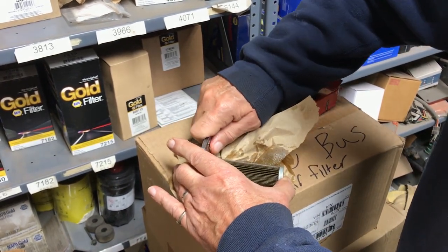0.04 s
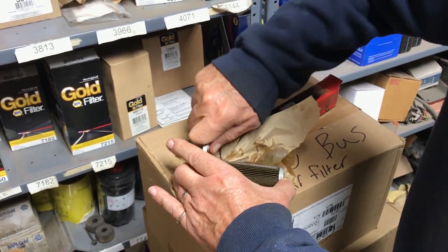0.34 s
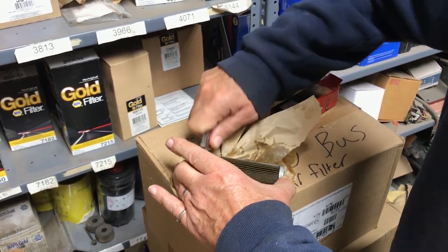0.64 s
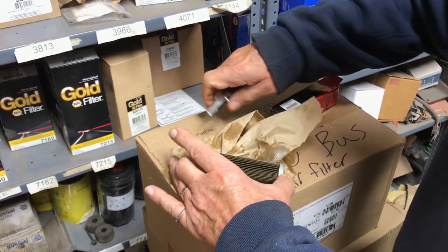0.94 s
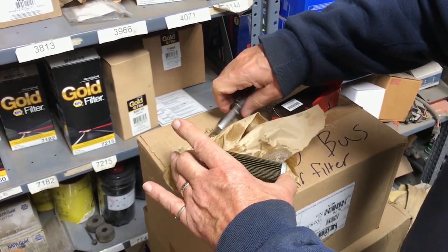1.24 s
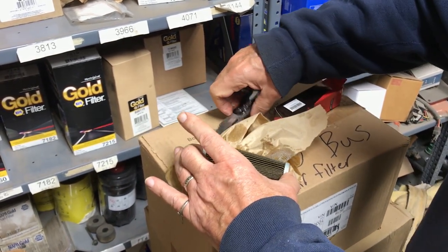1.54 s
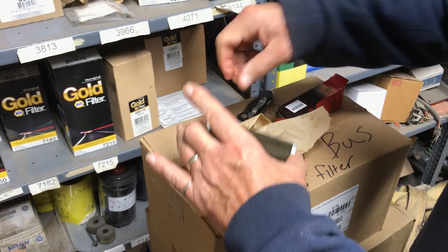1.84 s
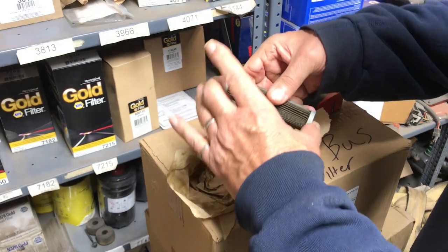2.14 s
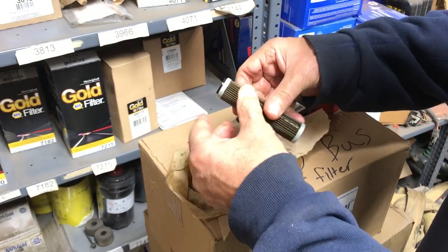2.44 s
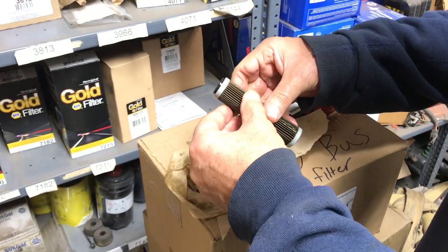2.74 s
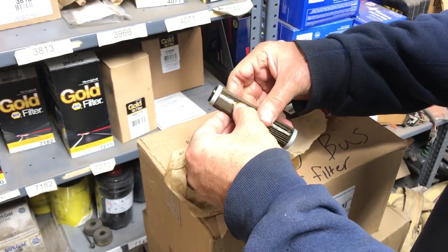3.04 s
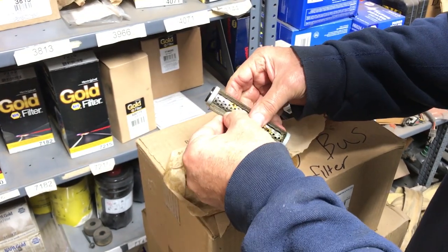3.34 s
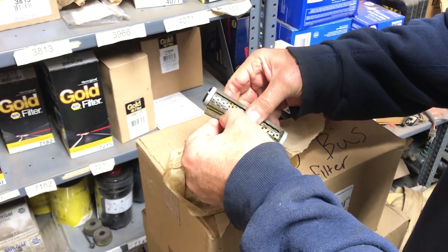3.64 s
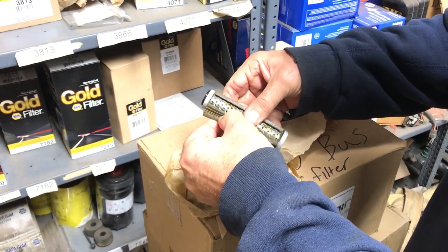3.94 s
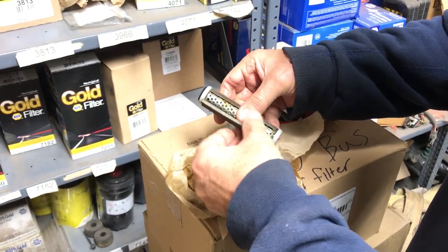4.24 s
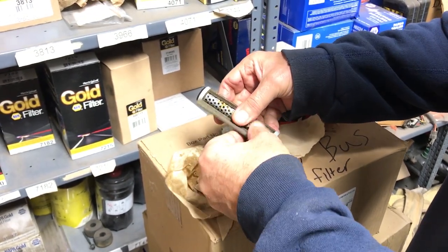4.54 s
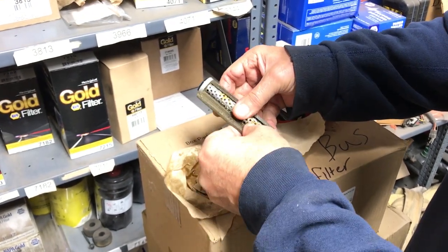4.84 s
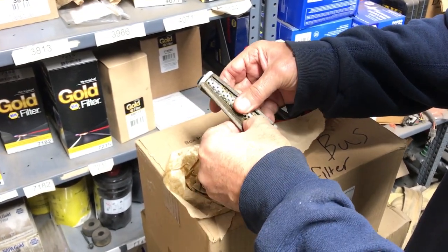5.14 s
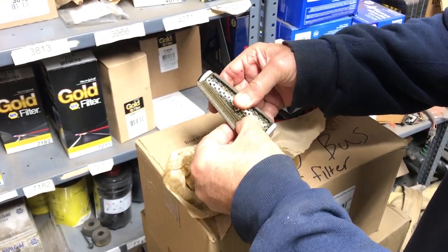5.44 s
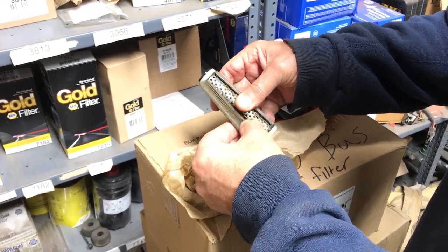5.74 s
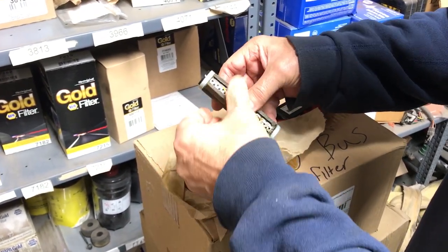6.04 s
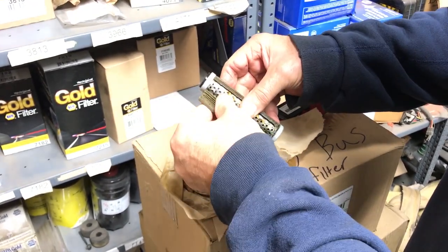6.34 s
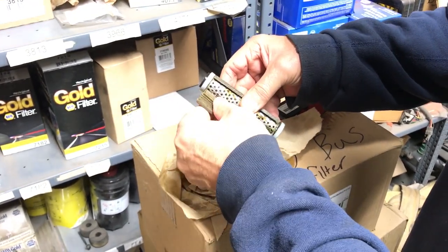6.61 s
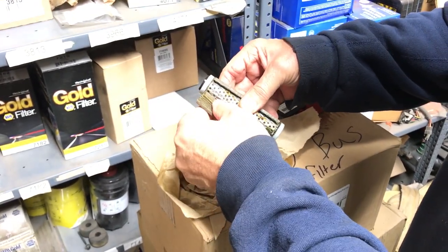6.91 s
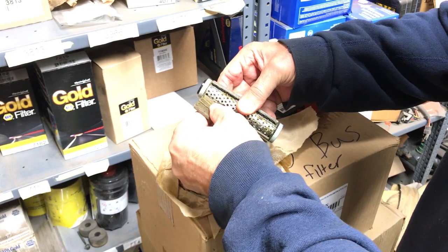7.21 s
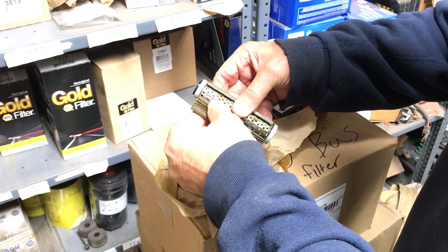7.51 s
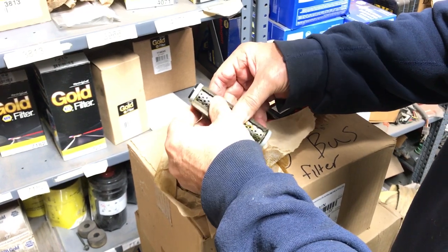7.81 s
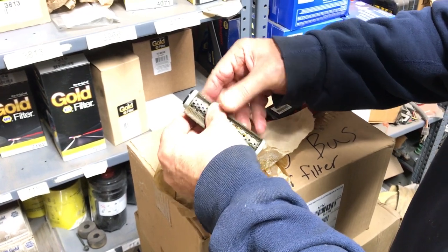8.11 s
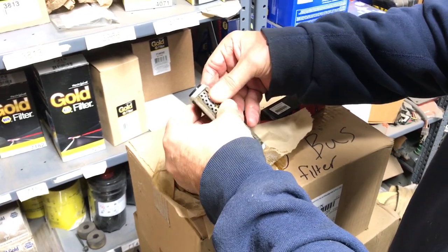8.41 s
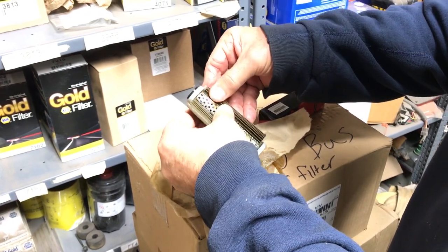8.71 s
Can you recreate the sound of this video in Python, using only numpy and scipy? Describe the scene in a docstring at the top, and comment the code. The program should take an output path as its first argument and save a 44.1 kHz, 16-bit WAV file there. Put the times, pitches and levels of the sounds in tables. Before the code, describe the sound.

A knife scrapes and knocks on a cardboard box, then fingers softly crinkle and tear pleated paper over a low indoor hum.

```python
"""A knife scrapes and taps a cardboard box as it slits a small pleated paper filter element on the lid.
The knife drops with one hollow knock, ringing the box's modes, and rocks to rest; two faint squeaks pass.
Sleeves rustle, and fingers rub, crinkle and tear the pleats off their core: fibres slip, pleats buckle.
Ventilation, mains hum and a faint electronic whine fill the storeroom throughout."""
import sys
import numpy as np
from scipy import signal
from scipy.fft import rfft, irfft, next_fast_len
from scipy.io import wavfile
from scipy.ndimage import uniform_filter1d

SR = 44100
rng = np.random.default_rng(int(sys.argv[2]) if len(sys.argv) > 2 else 0)


def transcribe(u):
    """Save the signal u as a 16-bit wav file named by the first command-line argument.

    u: samples, shape (n,) or (channels, n), limited to [-1, 1]; the rate is SR.
    q: integer samples, one column per channel.
    """
    v = np.clip(np.atleast_2d(u).T, -1, 1)
    q = np.round(v * 32767).astype(np.int16)
    wavfile.write(sys.argv[1], SR, q)


N = 386757
T = np.arange(N) / SR

# Blade strokes. Each row: middle in s, length in s, cardboard drag in dB, paper hiss in relative dB.
STROKES = [(.09, 0.30496, -64, -66.5), (0.398, .26, -64, -74), (.64, .24, -59.5, -64.5),
           (0.903, 0.31177, -66.5, -67.5), (1.19, .09, -52.5, -69), (1.295, .07, -60, -88),
           (1.395, .05, -61, -80), (1.485, .1, -63, -80), (1.577, 0.092, -57.5, -68.5)]
# Spectra of cardboard, paper body and crisp paper edge. Each row: frequency in Hz, gain in dB.
CARDBOARD_SPECTRUM = [(50, -6.5), (150, 7.5), (270, 9), (420, -4), (800, -0.5), (1200, -3.5), (2000, -14.5),
                      (3500, -23), (8000, -28.5), (16000, -34.5)]
BODY_SPECTRUM = [(200, -13.5), (600, -21), (950, -6), (1400, 4), (2400, 4.5), (3400, 4), (4600, -5),
                 (8000, -29)]
EDGE_SPECTRUM = [(2000, -29), (4000, -5), (6000, -2), (8000, -5), (10500, -4.5), (13000, -2.5),
                 (15500, -2.5), (16500, -24.5)]


def from_db(db):
    """Decibels to gain."""
    return 10 ** (np.asarray(db) / 20)


def unit_rms(x):
    """Scale to rms 1."""
    return x / np.sqrt(np.mean(x ** 2) + 1e-30)


def unit_hit(x, length_s):
    """Scale to the energy of an rms-1 sound lasting length_s."""
    return x * np.sqrt(length_s * SR / np.sum(x ** 2))


def at_hz(points, hz):
    """Interpolate a table over log frequency."""
    points_hz, values = np.transpose(points)
    return np.interp(np.log(np.maximum(hz, 1)), np.log(points_hz), values)


def add(track, start_s, sound):
    """Mix a sound in at start_s."""
    start = int(round(start_s * SR))
    first, last = max(start, 0), min(start + len(sound), N)
    track[first:last] += sound[first - start:last - start]


def decay(t, t60_s):
    """Exponential fall, 60 dB in t60_s."""
    return np.exp(-np.log(1000) * t / t60_s)


def swell(length_s, peak_share, power):
    """Arched envelope peaking at peak_share of its length; a lower power holds it longer."""
    phase = np.interp(np.linspace(0, 1, int(length_s * SR)), [0, peak_share, 1], [0, .5, 1])
    return np.abs(np.sin(np.pi * phase)) ** power


def wobble(size, every_s):
    """Random drift of rms 1 on a time scale of every_s."""
    return unit_rms(uniform_filter1d(rng.standard_normal(size), size=int(every_s * SR)))


def colour(x, spectrum):
    """Minimum-phase filter with the given spectrum."""
    size = 2 * next_fast_len(len(x))
    gain = from_db(at_hz(spectrum, np.arange(size // 2 + 1) * SR / size))
    cepstrum = irfft(np.log(gain))
    cepstrum[1:size // 2] *= 2
    cepstrum[size // 2 + 1:] = 0
    return irfft(rfft(x, size) * np.exp(rfft(cepstrum)), size)[:len(x)]


def resonance(x, hz, width_hz):
    """Two-pole resonator, peak gain 1."""
    r = np.exp(-np.pi * width_hz / SR)
    poles = [1, -2 * r * np.cos(2 * np.pi * hz / SR), r * r]
    return signal.lfilter(np.array([1, 0, -1]) * (1 - r * r) / 2, poles, x)


def burst(t, t60_s, scatter_db, scatter_t60_s):
    """Noise crack plus its scatter from hands, box and shelves."""
    envelope = decay(t, t60_s) + from_db(scatter_db) * decay(t, scatter_t60_s)
    return rng.standard_normal(len(t)) * envelope


def friction(size, slips_per_s, spread_db, hiss_share):
    """Fibres slip at random with very unequal strength, over a smooth hiss."""
    strength = from_db(spread_db * np.minimum(rng.exponential(1, size), 3))
    slips = (rng.random(size) < slips_per_s / SR) * strength * rng.choice([-1, 1], size)
    return unit_rms(unit_rms(slips) + hiss_share * rng.standard_normal(size))


def background(air_db=-68):
    """Steady noise of ventilation and far machinery, with mains hum and electronic whine."""
    # Air noise spectrum. Each row: frequency in Hz, gain in dB.
    air_spectrum = [(20, -43), (31, -21), (42, -3), (60, -8.5), (90, -12.5), (125, -11.5), (160, -16.5),
                    (300, -20.5), (460, -26.5), (900, -29), (3000, -31), (4800, -36), (6000, -36),
                    (15700, -38.5), (16200, -65.5)]
    # Hum and whine partials. Each row: frequency in Hz, rms level in dB.
    partials = [(120, -70), (1012, -89.5), (2024, -91), (3036, -89), (4048, -89), (6067, -89.5),
                (7079, -98), (8091, -99), (9103, -91.5), (11127, -104)]
    tones = sum(from_db(db) * np.sqrt(2) * np.sin(2 * np.pi * (hz * T + rng.random()))
                for hz, db in partials)
    return tones + from_db(air_db) * unit_rms(colour(rng.standard_normal(N), air_spectrum))


def cutting():
    """The blade sticks and slips, the box amplifies it, and the paper hisses as it parts."""
    out = np.zeros(N)
    for middle_s, length_s, drag_db, slit_db in STROKES:
        envelope = swell(length_s, peak_share=.5, power=.76)
        slips = friction(len(envelope), slips_per_s=1500, spread_db=5.5, hiss_share=.32)
        drag = envelope * unit_rms(colour(slips, CARDBOARD_SPECTRUM))
        slit = rasp(length_s, crisp_db=-.5, pleat_hz=2764, edge_hz=5000, ring_share=.29)
        add(out, middle_s - length_s / 2, from_db(drag_db) * drag + from_db(slit_db - 1) * slit)
    return out


def paper(force, spectrum, hz, width_hz, ring_share):
    """The paper's broad colour plus the resonance of the moving pleat."""
    broad = colour(force, spectrum)
    return broad + ring_share * resonance(broad, hz, width_hz)


def rasp(length_s, crisp_db, pleat_hz, edge_hz, ring_share, jerk_db=2.5):
    """One jerky stroke on paper: tiny slips excite its body and its crisp edge."""
    envelope = swell(length_s, peak_share=.5063, power=.83)
    slips = friction(len(envelope), slips_per_s=1000, spread_db=3.4, hiss_share=.75)
    slips *= from_db(jerk_db * wobble(len(envelope), every_s=.008))
    body = paper(slips, BODY_SPECTRUM, pleat_hz, width_hz=170, ring_share=ring_share)
    body += .3 * ring_share * resonance(body, pleat_hz, width_hz=240)  # neighbouring pleats
    body += .349 * ring_share * resonance(body, 1.92 * pleat_hz, width_hz=400)  # second mode
    edge = paper(slips, EDGE_SPECTRUM, edge_hz, width_hz=1800, ring_share=1)
    return envelope * (unit_rms(body) + from_db(crisp_db) * unit_rms(edge))


def catches(per_s=13, edge_hz=1700):
    """Small contacts as the blade drops unevenly from pleat to pleat."""
    contacts = []
    for middle_s, length_s, drag_db, _ in STROKES:
        count = int(per_s * length_s)
        for k, (when, strength) in enumerate(rng.random((count, 2))):
            start_s = max(middle_s + length_s * ((k + when) / count - .5), 0)
            thump_db = drag_db + 6 + (strength - .5)
            contacts.append((start_s, thump_db, edge_hz, thump_db - 18))
    return contacts


def knocks(contacts, ring_db=-1.5, flaps_db=-6, travel_s=.0018):
    """Each contact dents the lid, rings the box, shakes its flaps and cracks; sharper is brighter."""
    # Modes of the box and its air. Each row: frequency in Hz, relative level in dB, T60 in s.
    box_modes = [(71.584, -9.5, .16), (94, -10.5, 0.1), (168.32, -16.5, 0.19), (223, -8.5, 0.013),
                 (251, -4, 0.056), (353, -7.5, .07), (498.03, -10.5, 0.059), (610, -8, .035),
                 (653.6, -8, 0.05), (758.58, -17.5, .035), (933.5, -15, 0.047), (1084, -8.5, 0.046),
                 (1295.6, -15.5, 0.012), (1526, -11, 0.023), (1795.5, -8.5, 0.027)]
    # Hard crack spectrum. Each row: frequency in Hz, gain in dB.
    crack_spectrum = [(200, -23.5), (500, -3), (1200, -2.5), (1800, 2), (2300, -7), (2750, -2.5),
                      (3200, 0.5), (3900, -6), (5000, -8), (8000, -15.5), (16000, -22.5)]
    out, t = np.zeros(N), T[:SR // 2]
    hz, mode_db, t60_s = np.transpose(box_modes)
    # Bending waves: low modes arrive last.
    age_s = t - travel_s * (np.sqrt(hz[0] / hz[:, None]) - np.sqrt(hz[0] / hz[-1]))
    modes = (age_s > 0) * np.cos(2 * np.pi * hz[:, None] * age_s) * decay(age_s, t60_s[:, None])
    ring = from_db(mode_db + ring_db) @ modes
    for start_s, thump_db, edge_hz, crack_db in contacts:
        dent_hz = 290 * np.sqrt(edge_hz / 515)  # a sharper contact dents a smaller, quicker patch
        dent = np.cos(2 * np.pi * dent_hz * t) * decay(t, t60_s=.01)
        flaps = unit_rms(colour(rng.standard_normal(len(t)), CARDBOARD_SPECTRUM)) * decay(t, t60_s=.081)
        thump = dent + ring + from_db(flaps_db) * flaps
        thump = signal.sosfilt(signal.butter(4, edge_hz, fs=SR, output="sos"), thump)
        thump = signal.lfilter(*signal.butter(1, .14 * edge_hz, "high", fs=SR), thump)
        crack = colour(burst(t, t60_s=.02, scatter_db=-10, scatter_t60_s=.091), crack_spectrum)
        crack = unit_hit(crack, length_s=.0052)
        add(out, start_s, from_db(thump_db) * thump + from_db(crack_db) * crack)
    return signal.sosfilt(signal.butter(4, 42, "high", fs=SR, output="sos"), out)


def snaps(attack_s=.00043, crisp_db_per_octave=9):
    """A pleat buckles, or the paper parts under the knife: a dull push on the element, a brief panel ring, a
    crisp tick at the crease."""
    # Buckling pleats; the row at 1.042 s is the paper snapping through under the knife tap. Each row: start in
    # s, T60 in s, level in dB, tick offset in dB, # push offset in dB, pleat resonance in Hz.
    buckles = [(.234, 0.0062, -59.5, -7, -6.5, 2900), (0.467, 0.011, -55.5, -7, -7, 3080),
               (.653, 0.01482, -60, 0, 1.5, 1460), (0.695, 0.02081, -53, 6.5, -10, 3470),
               (0.8827, 0.0173, -61, -1.5, -19, 3530), (1.042, 0.01247, -50, 2.5, -7, 3910),
               (2.0907, .005, -66, -7.5, -12, 1610), (3.044, 0.012, -62.5, 9, -18, 1630),
               (3.213, 0.0032, -78, 15.5, -3, 2280), (3.327, .03, -69, 15, -10, 2300),
               (3.473, 0.0049, -58, -2, -24, 1600), (3.5571, 0.0071, -56, -1, -14, 2300),
               (3.635, .016, -48, -2.5, -25, 2180), (3.6636, 0.01666, -57.5, -14, -29.5, 2400),
               (3.7126, .014, -66.5, 6.5, -20, 1600), (3.9127, .017, -70.5, 6.5, -9.5, 3100),
               (4.778, .016, -57.5, -2.5, -9, 1460), (4.929, .044, -53.5, 1.5, -2.5, 2418),
               (5.088, .01, -70, 1.5, -14, 1397), (5.1921, 0.027, -65, -2, -2, 2260),
               (5.2679, 0.00969, -66.5, -13.5, -8.5, 3080), (5.374, 0.018, -69, 1.5, -1, 2550),
               (5.4503, .012, -61, 5, -6.5, 1481), (5.4674, 0.0043, -63, 4, -9, 3150),
               (6.486, 0.012, -60.5, -0.5, -15, 2300), (6.6, 0.00725, -62.5, 11, -4, 1340),
               (6.992, 0.012, -81, 20.5, -6, 2300), (7.07, 0.0655, -55, 0.5, -8.5, 1890),
               (7.2314, 0.02, -55, 1, -19, 2290), (7.318, 0.019, -67, -1, -7, 2340),
               (7.4407, 0.0231, -75, 13, -12, 3320), (7.6624, 0.005, -74, 14, -10, 2640),
               (8.655, 0.0034, -62, 7.5, -17, 2308), (8.7127, 0.041, -58.5, 5, -11, 2375)]
    # Dull push spectrum. Each row: frequency in Hz, gain in dB.
    push_spectrum = [(100, -16), (300, -34.5), (600, 4.5), (1100, -5), (1800, -10), (4000, -45)]
    # Panel modes. Each row: ratio to the pleat resonance, linear gain.
    panel_modes = [(.55, 0.52), (1, 1), (1.43, 0.148), (1.9, 0.14)]
    out, t = np.zeros(N), T[:SR // 10]
    attack = 1 - np.exp(-t / attack_s)
    for start_s, t60_s, db, crisp_db, push_db, pleat_hz in buckles:
        push = colour(attack * burst(t, t60_s, scatter_db=-1, scatter_t60_s=.06), push_spectrum)
        body = colour(attack * burst(t, t60_s, scatter_db=-6.5, scatter_t60_s=.06), BODY_SPECTRUM)
        body += 2.241 * sum(gain * resonance(body, ratio * pleat_hz, width_hz=129.8)
                            for ratio, gain in panel_modes)
        crease_hz = np.clip(6111 * 2 ** (crisp_db / crisp_db_per_octave), 5000, 13000)
        force = burst(t, t60_s, scatter_db=-13, scatter_t60_s=.0961)
        tick = paper(force, EDGE_SPECTRUM, crease_hz, width_hz=4300, ring_share=1.15)
        for part, part_db in ((push, push_db), (body, .5), (tick, crisp_db - 1)):
            add(out, start_s, from_db(db + part_db) * unit_hit(part, length_s=.0082))
    return out


def squeaks(waver_share=.0087, flutter_db=1):
    """Thin, unsteady tones that swell and rise slowly, then sink and fade faster."""
    # Pitch arches. Each row: middle in s, length in s, level in dB, top in Hz, droop at the ends in Hz.
    arches = [(1.279, 0.39, -70, 2760, 45.12), (1.945, 0.22, -76, 4440, 350)]
    out = np.zeros(N)
    for middle_s, length_s, db, top_hz, droop_hz in arches:
        arch = swell(length_s, peak_share=.75, power=.7)
        envelope = arch * from_db(flutter_db * wobble(len(arch), every_s=.016))
        waver = 1 + waver_share * wobble(len(arch), every_s=.00209)
        hz = (top_hz - droop_hz * (1 - arch)) * waver
        tone = np.sin(2 * np.pi * np.cumsum(hz) / SR)
        add(out, middle_s - length_s / 2, from_db(db) * envelope * tone)
    return out


def rocking(start_s=1.7845, first_gap_s=.086, gap_ratio=.73, first_db=-38, loss_db=5):
    """Contacts of the dropped knife settling end after end, ever quicker and weaker."""
    contacts, crack_offset_db = [], -25.5
    for k in range(4):
        gap_s, db = first_gap_s * gap_ratio ** k, first_db - loss_db * k
        for lag_s, thump_db, edge_hz in ((0, db, 1860), (.4 * gap_s, db - 2, 520)):
            contacts.append((start_s + lag_s, thump_db, edge_hz, thump_db + crack_offset_db))
        start_s += gap_s
    return contacts


def sleeves():
    """Soft low-mid cloth noise with each shift of the arms."""
    # Arm shifts. Each row: middle in s, length in s, level in dB.
    shifts = [(2.05, 0.4856, -74.5), (3.55, 1.08, -73.5), (4.951, .8, -74.5), (7.25, 1.1, -77.5),
              (8.5, .9, -82)]
    out = np.zeros(N)
    for middle_s, length_s, db in shifts:
        envelope = swell(length_s, peak_share=.3471, power=1)
        cloth = resonance(rng.standard_normal(len(envelope)), hz=289.3, width_hz=54)
        cloth = unit_rms(resonance(cloth, hz=317.05, width_hz=1628.6))
        add(out, middle_s - length_s / 2, from_db(db) * envelope * cloth)
    return out


def crinkles(start_s=2.6, count=45, softest_db=-77, range_db=8):
    """Single fibres of the handled element give way with tiny ticks."""
    out, t = np.zeros(N), T[:SR // 30]
    for when, strength, pitch in rng.random((count, 3)):
        hz = 1500 * 9 ** pitch
        force = burst(t, t60_s=.011, scatter_db=-1.5, scatter_t60_s=.027)
        tick = paper(force, EDGE_SPECTRUM, hz, width_hz=hz / 5, ring_share=5.533)
        tick = from_db(softest_db + range_db * strength) * unit_hit(tick, length_s=.005914)
        add(out, start_s + when * (T[-1] - start_s), tick)
    return out


def rubs(gain_db=-1.04, torn_s=3.2, taut_ring=3.6, loose_ring=1):
    """Paper slides and tears under the fingers; pleats ring more on the core than once torn loose."""
    # Finger pulls. Each row: middle in s, length in s, relative level in dB, edge over body in dB,
    # pleat resonance in Hz, edge resonance in Hz.
    pulls = [(2.739, 0.09604, -71.5, 3, 1545, 6600), (2.946, .09, -67, -7, 1577, 13000),
             (3.03, 0.07815, -62, -2, 1624, 11800), (3.094, .1, -65.5, 0.5, 1680, 12900),
             (3.268, 0.10897, -66.5, 4.5, 1920, 13530), (3.334, .08, -61, 8.5, 2255, 12600),
             (3.827, 0.03241, -61.5, -6, 2310, 6100), (4.03, 0.072, -63.5, 3.5, 1524, 13130),
             (4.768, 0.10703, -73, 3.5, 1486, 5020), (4.973, 0.06114, -67.5, -1, 2740, 6663),
             (5.2, 0.085, -63.5, -3, 2317, 5050), (5.316, 0.13555, -69, -2, 1370, 4980),
             (5.796, 0.037, -62.5, 1.5, 2480, 6500), (5.884, 0.17, -72.5, 5, 1656, 5140),
             (6.518, 0.3, -79, 7.5, 2330, 6700), (6.895, .07, -73.5, -1.5, 2270, 5020),
             (7.451, 0.041, -70, 8, 3053, 6630), (7.629, 0.056, -70, 4.5, 1400, 6465),
             (8.053, .11, -75.5, 12, 2960, 5950), (8.21, 0.1984, -74, 4.5, 2320, 6600),
             (8.446, 0.19, -73, 3, 2700, 6203), (8.603, 0.10054, -65, 3, 2360, 12350),
             (8.706, 0.074, -62, 2, 2320, 6400)]
    out = np.zeros(N)
    for middle_s, length_s, db, crisp_db, pleat_hz, edge_hz in pulls:
        ring_share = taut_ring if middle_s < torn_s else loose_ring
        pull = rasp(length_s, crisp_db, pleat_hz, edge_hz, ring_share)
        add(out, middle_s - length_s / 2, from_db(db + gain_db) * pull)
    return out


def room(x, wet_db=-13, build_s=.0072):
    """Crowded shelves give a weak diffuse tail, strongest and longest in the bass."""
    # Reverberation. Each row: frequency in Hz, T60 in s, relative level in dB.
    reverb = [(49.26, 0.58, -0.5), (100, 0.8894, 3.5), (250, 0.49, -1.5), (1004.3, 0.29, -1.5),
              (4000, 0.24, -2.5), (15970, 0.15, -3.5)]
    t60_points, db_points = np.array(reverb)[:, :2], np.array(reverb)[:, ::2]
    t, tail = T[:SR], 0
    edges_hz = np.geomspace(35, 17000, 10)
    for low_hz, high_hz in zip(edges_hz, edges_hz[1:]):
        hz = np.sqrt(low_hz * high_hz)
        bandpass = signal.butter(2, [low_hz, high_hz], "band", fs=SR, output="sos")
        band = signal.sosfilt(bandpass, rng.standard_normal(len(t)))
        band *= decay(t, at_hz(t60_points, hz)) * (1 - np.exp(-t / build_s))
        band *= np.sqrt(2 * (high_hz - low_hz) / SR / np.sum(band ** 2))  # unit gain in the band
        tail += from_db(at_hz(db_points, hz)) * band
    return x + from_db(wet_db) * signal.fftconvolve(x, tail)[:N]


def scene():
    """Knife, box and paper close by in the storeroom, mono."""
    # Knife taps and drop. Each row: start in s, thump in dB, thump's upper edge in Hz, crack in dB.
    knife_hits = [(.152, -48.5, 1300, -64), (0.271, -47, 1540, -58.5), (.388, -48.5, 1820, -57),
                  (.436, -53, 1800, -66), (.529, -51, 1600, -71.5), (0.702, -40.5, 196, -68),
                  (1.0385, -23.5, 1502, -55), (1.0425, -33.5, 1198, -46), (1.053, -23, 201, -72),
                  (1.161, -42, 1291, -60), (1.179, -44, 1499, -60), (1.609, -18.5, 1100, -40.5),
                  (1.617, -17, 560, -41), (1.6289, -13.5, 1498, -26), (1.64, -11.5, 400, -52),
                  (1.673, -33, 592, -47.5), (1.6823, -23, 450, -53.5), (1.7242, -38, 1400, -58)]
    knife = knocks(knife_hits + rocking() + catches()) + cutting()
    return (background() + squeaks() + sleeves() + room(knife + snaps() + rubs() + crinkles()))[None]


def record(dry):
    """Steep low-pass at 16.5 kHz."""
    return signal.sosfilt(signal.ellip(10, .1, 70, 16500, fs=SR, output="sos"), dry)


dry = scene()
out = record(dry)
transcribe(out)
```